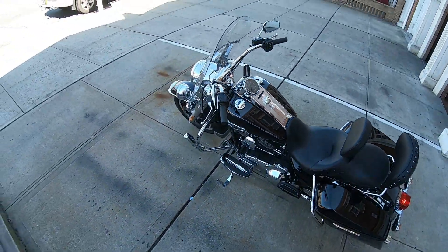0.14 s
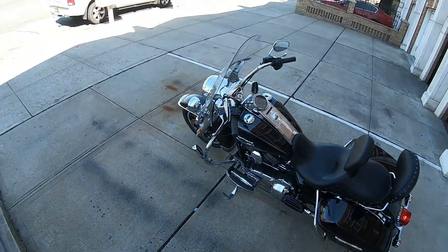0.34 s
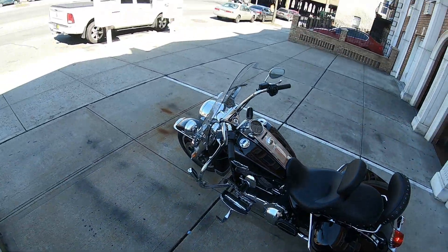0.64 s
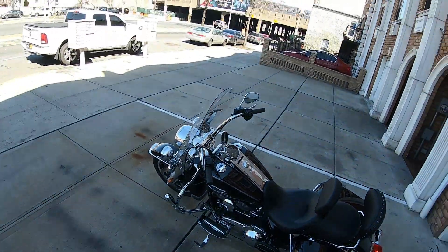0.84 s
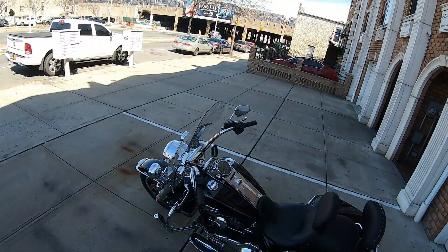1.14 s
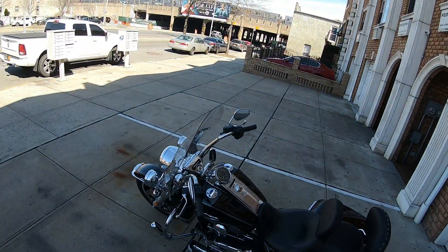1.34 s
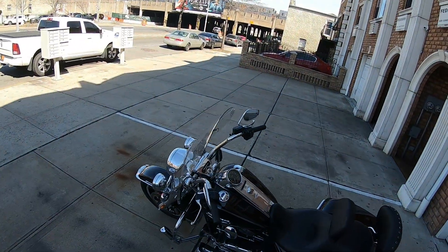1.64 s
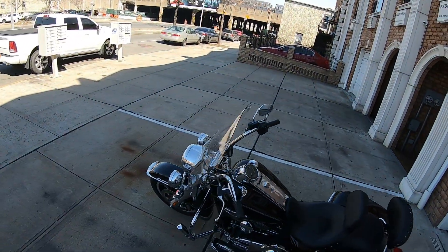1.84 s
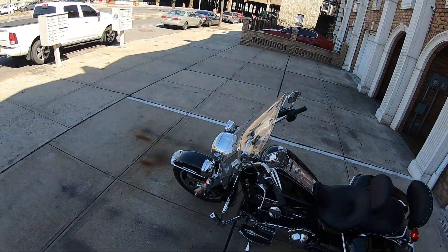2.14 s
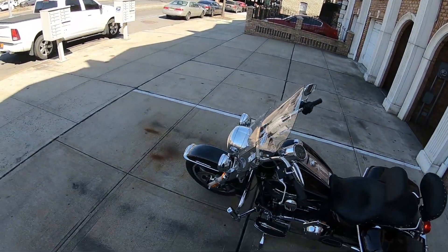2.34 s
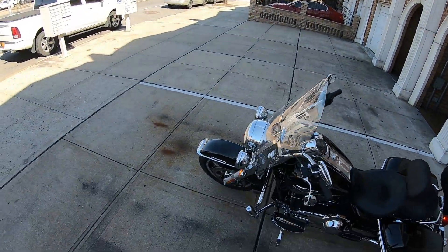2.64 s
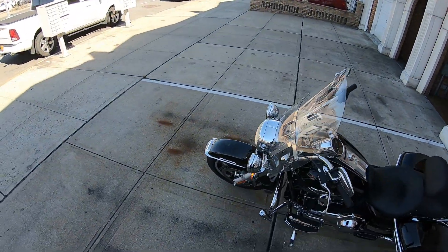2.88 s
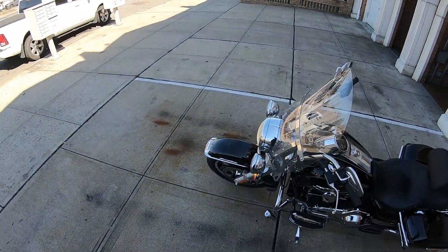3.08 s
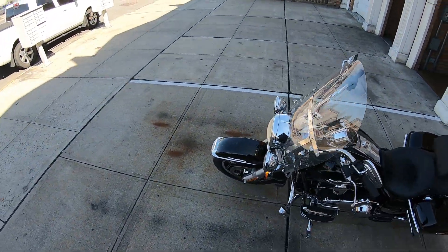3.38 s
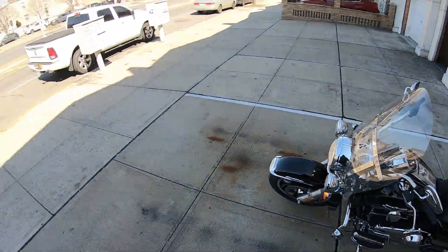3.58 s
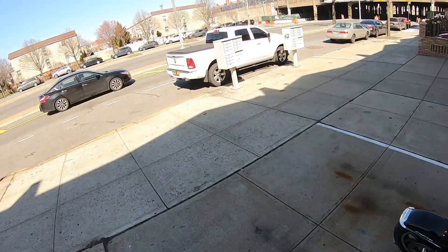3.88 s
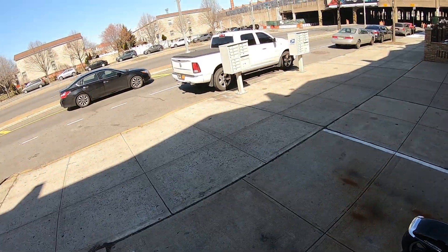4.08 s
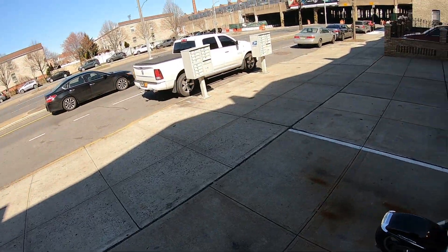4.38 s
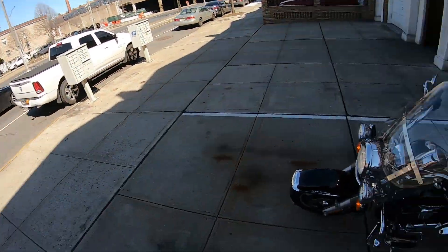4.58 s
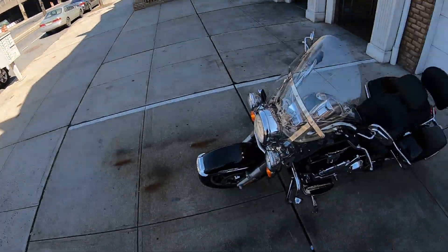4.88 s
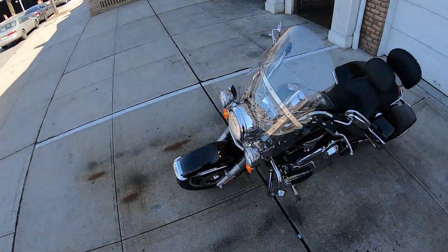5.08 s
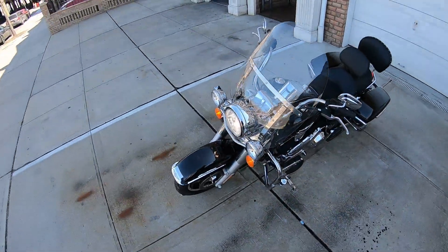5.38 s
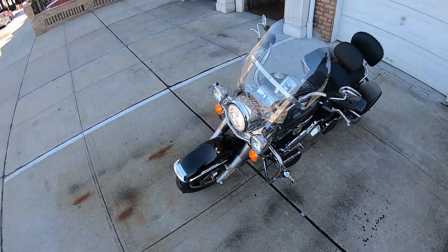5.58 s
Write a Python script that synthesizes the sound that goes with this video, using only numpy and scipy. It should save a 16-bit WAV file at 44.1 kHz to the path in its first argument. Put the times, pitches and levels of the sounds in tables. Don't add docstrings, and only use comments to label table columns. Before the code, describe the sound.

Close, portable capture of a parked motorcycle idling. Heavy low exhaust pulses dominate first, each preceded by a light metallic tick. Midway, wind thumps the microphone cover and whistles briefly; then gears and cases become more noticeable. Treble drops for a moment, returns, and the engine ends with thinner bass, still steadily chugging.

```python
import sys
import numpy as np
from scipy import signal
from scipy.fft import rfft, irfft
from scipy.io import wavfile
from scipy.ndimage import uniform_filter1d

SR = 44100
rng = np.random.default_rng(int(sys.argv[2]) if len(sys.argv) > 2 else 0)


def volts_from_decibels(level):
    exponent = np.asarray(level, float) / 20
    return 10 ** exponent


def wav_out(sig):
    wavfile.write(sys.argv[1], SR, np.round(np.clip(np.atleast_2d(sig).T, -1, 1) * 32767).astype(np.int16))


N = 252252
TIME = np.arange(N) / SR
FREQ = np.maximum(np.arange(N // 2 + 1) * SR / N, 1)


def level(x, db):
    return x * volts_from_decibels(db) / np.sqrt(np.mean(x ** 2))


def curves(table, along=TIME):
    s, *columns = np.transpose(table)
    return [np.interp(along, s, c) for c in columns]


def colour(x, points, lo_hz=1, hi_hz=30000, peaks=()):
    hz, db = np.transpose(points)
    db = np.interp(np.log(FREQ), np.log(hz), db)
    for centre, width, top_db in peaks:
        db = db + top_db / (1 + (2 * (FREQ - centre) / width) ** 2)
    low_cut = 1 / (1 + (lo_hz / FREQ) ** 8)
    high_cut = 1 / (1 + (FREQ / hi_hz) ** 8)
    return irfft(rfft(x) * volts_from_decibels(db) * np.sqrt(low_cut * high_cut), N)


def drift(rate):
    k = int(SR / rate)
    held = np.repeat(rng.standard_normal(N // k + 1), k)
    return uniform_filter1d(uniform_filter1d(held, k), k)[:N]


def rings(times, dbs, modes, detune=0.025, scatter_db=0., size=8820):
    out = np.zeros(N)
    chance = rng.standard_normal((len(times), len(modes), 2))
    for s, db, draws in zip(times, dbs, chance):
        start = int(s * SR) - SR // 40
        part = slice(max(start, 0), start + size)
        for (hz, arrival, decay, power, mode_db), (bend, spread) in zip(modes, draws):
            ms = np.maximum((TIME[part] - s) * 1000 - arrival, 0)
            swell = (ms / (power * decay)) ** power * np.exp(power - ms / decay)
            turns = hz * (1 + detune * bend) * ms / 1000
            loudness = volts_from_decibels(db + mode_db + scatter_db * spread)
            out[part] += loudness * swell * np.sin(2 * np.pi * turns)
    return out


def bursts(times, dbs, rise_ms, fall_ms):
    marks = np.zeros(N)
    index = (times * SR).astype(int)
    inside = (index >= 0) & (index < N)
    marks[index[inside]] = volts_from_decibels(dbs[inside])
    ms = np.arange(SR // 20) / SR * 1000
    puff = (1 - np.exp(-ms / rise_ms)) ** 2 * np.exp(-ms / fall_ms)
    return signal.fftconvolve(marks, puff)[:N]


def wind():
    # time in seconds, flutter level in dB
    breeze = [(0, -47), (.9, -46.5), (1.45, -44), (2.25, -51.5), (2.6, -46.5), (2.85, -51), (3.45, -56.5),
              (4.2, -49.5), (4.9, -53.5), (5.72, -57.5)]
    # frequency in Hz, density in dB per Hz
    gust_tone = [(60, -17.5), (150, -12.5), (250, -10), (400, -16), (800, -20), (1500, -30), (3000, -53),
                 (8000, -120)]
    # peak in seconds, level in dB, half length in ms
    gusts = [(1.44, -38.5, 24), (1.5, -40.5, 31), (1.555, -33.5, 22), (1.6, -47, 9.4), (1.68, -62, 37),
             (1.78, -39.5, 45), (2.0, -39.5, 27), (2.1, -50, 10), (2.24, -40, 15), (2.37, -46, 12),
             (2.419, -24.5, 13), (2.444, -26, 20), (2.483, -32, 7.9), (2.575, -38, 9.8), (2.615, -51, 12),
             (2.649, -40, 13.5), (2.69, -41.5, 15), (2.8, -45, 10), (3.84, -44.5, 17), (4.55, -51.5, 75),
             (4.81, -43, 22)]
    # time in seconds, pitch in Hz, level in dB
    edge_whistle = [
        (2.5, 370, -60),
        (2.57, 390, -38.5),
        (2.63, 440, -39),
        (2.7, 560, -36.5),
        (2.74, 600, -60),
    ]
    puffs = np.zeros(N)
    for s, db, half in gusts:
        side = half * np.where(TIME < s, 0.52, 1)
        puffs += volts_from_decibels(db) * np.exp(-((TIME - s) * 1000 / side) ** 2 / 2)
    flutter = volts_from_decibels(curves(breeze)[0] + 8)
    ragged = colour(rng.standard_normal(N) * volts_from_decibels(3 * drift(120)), gust_tone)
    rumble = colour(rng.standard_normal(N), [(20, 10.0), (80, -8.5)], 34, 62)
    rumble_db = -37.5 + 5 * drift(5.1)
    hz, whistle_db = curves(edge_whistle)
    breathy = colour(rng.standard_normal(N), [(20, 0.1), (90, -3), (400, -24), (2000, -90)])
    whistle = level(breathy * np.sin(2 * np.pi * np.cumsum(hz) / SR), whistle_db)
    return whistle + level(ragged, 0) * (puffs + flutter) + level(rumble, rumble_db + .5)


def whine(angle, away):
    # angle in degrees, mesh in dB, overtone in dB
    singing = [(0, -62, -75.5), (20, -46.5, -71.5), (40, -65, -74.5), (70, -45.5, -76), (84, -45, -70.5),
               (100, -47.5, -68), (130, -60.5, -75), (155, -52.5, -64), (173, -48.5, -79), (175, -52, -80)]
    shade_db = -13 * away
    mesh_db, overtone_db = curves(singing, angle)
    noise = rng.standard_normal((2, N)) * volts_from_decibels(4 * drift(60))
    mesh = colour(noise[0], [(2650, -70), (3170, -8), (3290, 0), (3420, -8), (3950, -70)])
    overtone = colour(noise[1], [(6500, -70), (7030, -5), (7100, 0), (7170, -5), (7700, -70)])
    return level(mesh, mesh_db + shade_db - 0.5) + level(overtone, overtone_db + shade_db - 2.5)


def machinery(first, second, first_db, second_db, angle, away):
    # angle in degrees, then cases, gears, valve gear and fine hiss in dB
    radiation = [(0, -41, -49, -47.5, -68.5), (22, -40, -45.5, -46, -65), (60.3, -44, -48.5, -46.5, -66),
                 (81.7, -42, -48.5, -42.5, -71.5), (105, -46.5, -43, -44, -68),
                 (127, -42.5, -45, -44.5, -66.5), (157, -43, -46, -49, -60.5),
                 (181, -46.5, -49, -49.5, -65.5)]
    # frequency in Hz, density in dB per Hz
    muffle = [(300, -16.5), (600, -14), (1500, -21.5), (2600, -25), (3300, -26.5), (4000, -26.5),
              (4600, -40.5), (5600, -45.5), (7000, -38), (8400, -34), (9500, -52.5), (11000, -53),
              (13000, -59.5), (16000, -72)]
    # centre in Hz, width in Hz, height in dB
    case_peaks = [(832.7, 100, 10), (1197, 59, 7.5), (1672, 120, 2.5), (3100, 250, 4), (7650, 280, 4)]
    # frequency in Hz, density in dB per Hz
    tick_tone = [(1200, -23), (1700, 9.5), (2500, -14), (3300, 8), (4000, -16), (4600, -24.5),
                 (5500, -31.5), (9000, -59.5)]
    # pitch in Hz, arrival in ms, decay in ms, build-up power, level in dB
    both_covers = [(1756, -7, 2.7, 1.2, -10.5), (3236, -4, 2.5, 1.4, -12)]
    rear_cover = [(3550, -9, 1.9, 2.4, -5.5)]
    front_cover = [(3930, -9, 1.9, 2.4, -3.5), (4500, -9, 1.5, 2.2, -16)]

    cases_db, gears_db, valves_db, hiss_db = curves(radiation, angle)
    hiss_db = hiss_db - 3 * away
    times, dbs = np.r_[first, second], np.r_[first_db, second_db]
    ticks = bursts(times - .0095, dbs - .4, 2.7, 5.6)
    snap_db = .5 * dbs - np.repeat([0, 10], len(first))
    snaps = bursts(times - .0095, snap_db, 3.2, 6.5)
    accent = snaps / snaps.max()
    tap_times = rng.uniform(0, N / SR, N // 700)
    taps = 1 + 0.6 * bursts(tap_times, -5 * rng.exponential(size=N // 700), .6, 5.5)
    puff = bursts(second - .018, 0 * second, 2.8, 8.2)
    noise = rng.standard_normal((6, N))

    cases = colour(noise[0], muffle, 690, 1400, case_peaks)
    cases = level(cases, cases_db - 1.5 + 0.36 * drift(18)) * (1 + 1.2 * puff)
    gears = colour(noise[1] * (taps + accent), muffle, 1500, 2600, case_peaks)
    gears = level(gears, gears_db + 0.42 * drift(12))
    valves = colour(noise[2] * (taps + 2.1 * accent), muffle, 2600, 5200, case_peaks)
    valves = level(valves, valves_db + 1.2 * drift(7.3))
    middle = colour(valves, [(1, 0), (2, 0)], 2500, 3650)
    valves = valves + (volts_from_decibels(-11 * away) - 1) * middle
    hiss = colour(noise[3] * taps, muffle, 4700, peaks=case_peaks)
    hiss = level(hiss, hiss_db + 1.2 * drift(21))

    tick = level(colour(noise[4], tick_tone), -4.5) * ticks
    covers = rings(times, dbs, both_covers, .03, 0.36, size=2205)
    front_db = 14 * np.tanh((np.interp(times, TIME, angle) - 96) / 30)
    for cover, lean_db in [(rear_cover, -front_db), (front_cover, front_db)]:
        covers = covers + rings(times, dbs + np.minimum(lean_db, 0), cover, .025, 2.3, size=2205)
    snap = level(colour(noise[5] * snaps, muffle, 4600), hiss_db - 0.5)
    return cases + gears + valves + hiss + tick + covers + snap


def exhaust(first, second, first_db, second_db, angle):
    # angle in degrees, then boom, edge, rasp and knock in dB
    radiation = [(0, -19, -37.5, -36, 0), (33.8, -17, -30.5, -30, -5), (60.3, -22, -49, -57.5, -9.5),
                 (102, -20, -41, -48.5, -5), (129, -25, -30, -62.5, -4.5), (162, -24, -26.5, -52.5, 3.5),
                 (179, -28, -28.5, -61, -1)]
    # pitch in Hz, arrival in ms, decay in ms, build-up power, level in dB
    first_boom = [(54, -7.5, 7, 3.5, -9), (181, -15, 9, 2.5, -17.5)]
    second_boom = [(57, -22, 10, 3.5, 0), (181, -4, 9, 2.5, -13.5)]
    first_bark = [(105, -22.5, 13, 3.5, -24), (117.5, -23, 5, 4, -9), (147, -17, 4, 6, -22.5)]
    second_bark = [(110.5, -23.5, 4.3, 6, -8.5), (124.5, -22.5, 8, 3.5, -11.5), (158.5, -12, 5, 7, -21)]
    first_edge = [(204.9, -13, 14, 2.7, -5.5), (244, -13.5, 5.8, 4.2, -10), (262.8, -13, 10, 2.8, -16)]
    second_edge = [(210.8, 0.5, 11.5, 2.2, -1.5), (235.2, -4.5, 32, 0.77, -17.5),
                   (277.4, -6, 6.1, 1.5, -21)]
    rasp_modes = [(348.8, -13.5, 35, 1.3, 0)]
    knock_modes = [(322, -21, 3.2, 2.5, -39)]
    boom_db, edge_db, rasp_db, knock_db = curves(radiation, angle)
    tight, loose, uneven_db = .006, .015, 1.5

    def pair(one, two, detune, scatter_db=0.):
        ring = rings(first, first_db, one, detune, scatter_db)
        return ring + rings(second, second_db, two, detune, scatter_db)

    boom = level(pair(first_boom, second_boom, loose, uneven_db), boom_db - .6)
    edge = level(pair(first_edge, second_edge, loose, uneven_db), edge_db - 4.5)
    rasp = level(pair(rasp_modes, rasp_modes, loose, uneven_db), rasp_db - 8.5)
    bark = pair(first_bark, second_bark, tight)
    knock = rings(first, first_db, knock_modes, loose, uneven_db) * volts_from_decibels(knock_db)
    return bark + knock + boom + edge + rasp


def marked(times, usual, events):
    s, db = np.transpose(events)
    out = usual.copy()
    out[np.abs(times - s[:, None]).argmin(axis=1)] = db
    return out


def scene():
    # time in seconds, crank running late in ms
    hunt = [(0, 0.1), (.64, -1.46), (.73, 8), (.98, 5), (1.15, 9), (1.32, 7.5), (1.4, 4), (1.49, 6.5),
            (2.25, 10), (2.46, 9.5), (3.13, 7), (3.51, 12.2), (3.6, 11), (3.94, 6), (4.53, 10.5),
            (5.12, -1.5), (5.29, -3), (5.72, 0.8)]
    # time in seconds, level in dB
    lean = [(.05, -3.5), (.22, -5.5), (.64, -7), (.82, -8), (1.33, -3), (1.41, -4.5), (1.5, -4),
            (1.58, -5.5), (2.68, -8), (3.02, -4), (3.53, -4.5), (3.69, -4.5), (3.86, -9.5), (4.03, -7.5),
            (4.37, -3), (4.54, -7.5), (4.62, -1.5), (4.7, -8), (4.87, -6), (4.95, -3), (5.2, -6),
            (5.28, -4), (5.37, -8), (5.71, -6)]
    # time in seconds, level in dB
    hard_ticks = [(.73, -33), (.82, -32), (.99, -33), (1.07, -30), (1.24, -35), (1.33, -35.5),
                  (1.41, -28.5), (1.75, -30), (1.92, -29.5), (2.34, -31.5), (2.68, -34), (3.02, -29.5),
                  (3.1, -32), (3.27, -30), (3.44, -31.5), (4.62, -31.5), (5.2, -34)]
    # time in seconds, angle from the tail in degrees
    path = [
        (0, 9),
        (1.3, 25.7),
        (1.7, 65),
        (2.6, 65),
        (3.0, 109),
        (3.5, 130),
        (4.6, 145),
        (5.0, 158),
        (5.72, 186),
    ]
    # time in seconds, share turned away 0-1
    swing = [
        (3.55, 0.14),
        (3.95, 1),
        (4.3, 1.01),
        (4.5, 1),
        (4.65, 0.1),
    ]

    cycle_s, start_s, second_share = .0844, -.0312, .428
    steady = np.arange(start_s, N / SR, cycle_s)
    first = steady + curves(hunt, steady)[0] / 1000
    gaps = np.diff(first)
    second = first + second_share * np.r_[gaps, gaps[-1]]
    chance = np.clip(rng.standard_normal((len(first), 4)).T, -2, 1.5)
    shade_db = -2.5 * curves(swing, first)[0]
    first_db = 1.9 + 1.2 * chance[0]
    second_db = marked(first, -3 + 1.33 * chance[1], lean)
    tick_db = marked(first, -38 + shade_db + 3 * chance[2], hard_ticks)
    tock_db = -43.5 + shade_db + 3 * chance[3]

    angle, away = curves(path)[0], curves(swing)[0]
    pipes = exhaust(first, second, first_db, second_db, angle)
    engine = machinery(first, second, tick_db, tock_db, angle, away)
    return (wind() + whine(angle, away) + engine + pipes)[None]


def low_pass(x):
    return signal.sosfilt(signal.butter(12, 15700, fs=SR, output="sos"), x)


def record(dry):
    drive = 1.1
    rounded = np.tanh(drive * volts_from_decibels(.7) * dry) / drive
    return low_pass(rounded)


dry = scene()
out = record(dry)
wav_out(out)
```